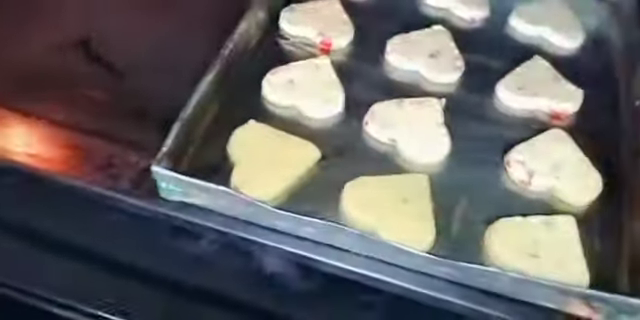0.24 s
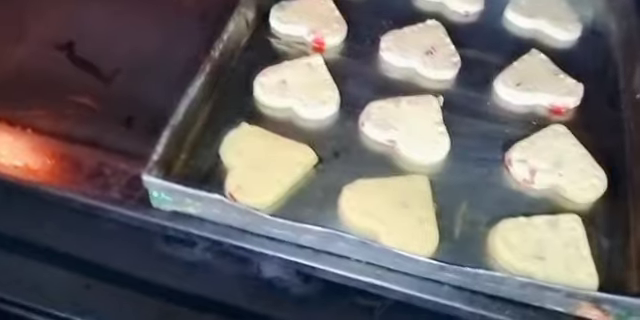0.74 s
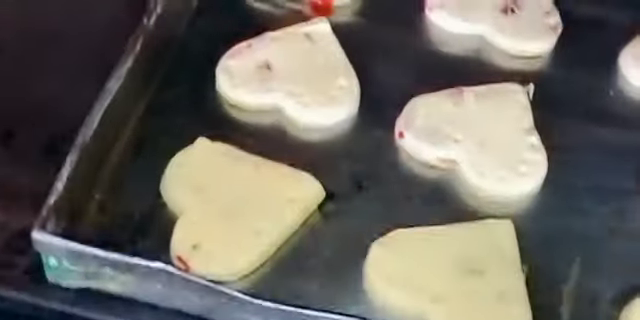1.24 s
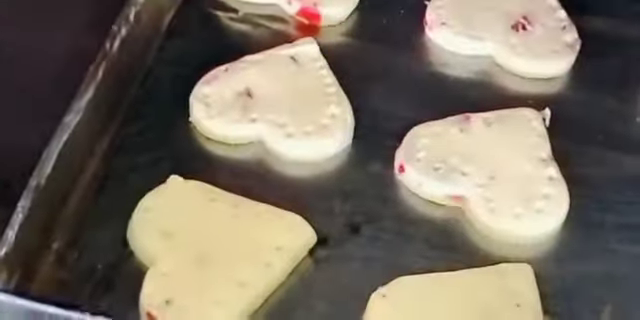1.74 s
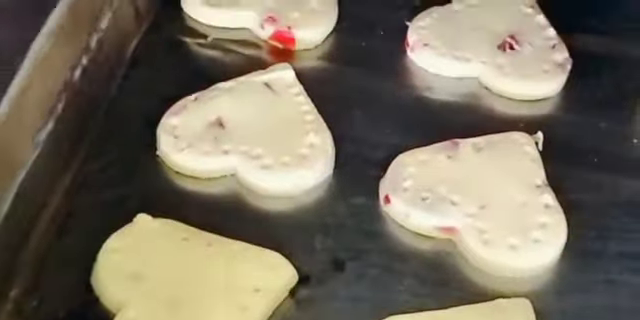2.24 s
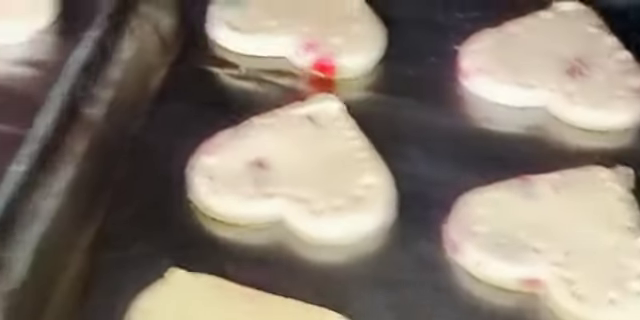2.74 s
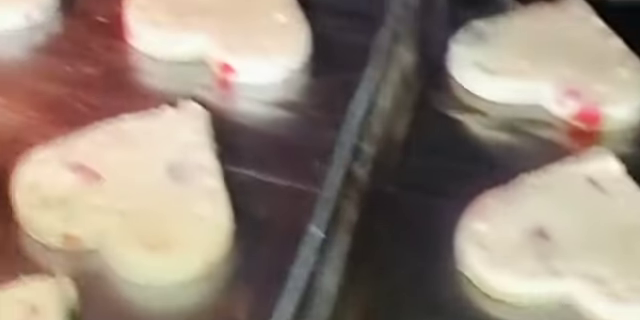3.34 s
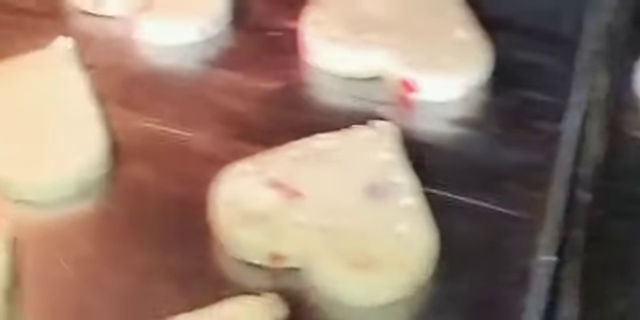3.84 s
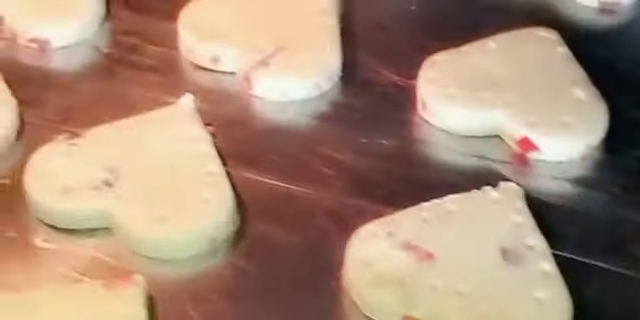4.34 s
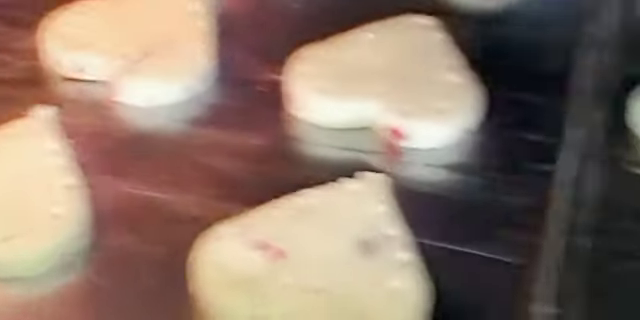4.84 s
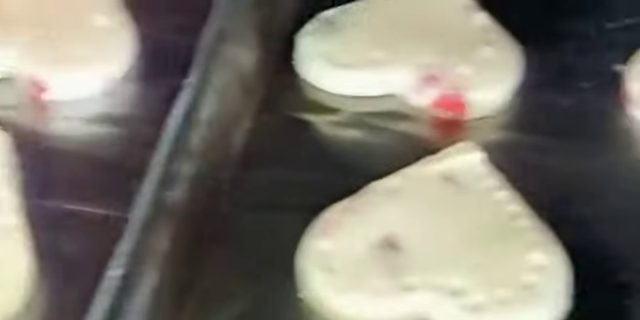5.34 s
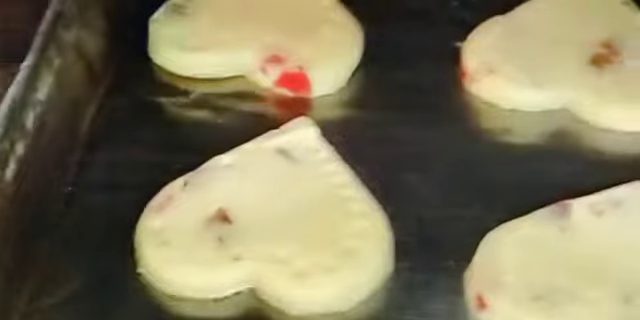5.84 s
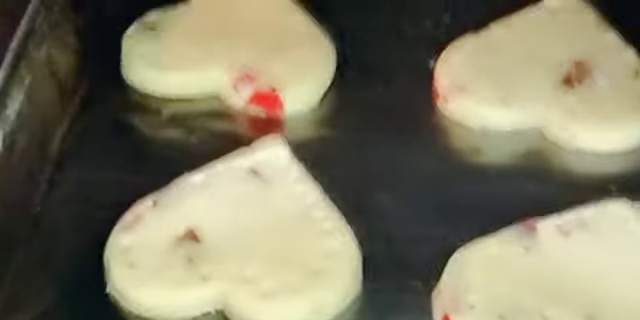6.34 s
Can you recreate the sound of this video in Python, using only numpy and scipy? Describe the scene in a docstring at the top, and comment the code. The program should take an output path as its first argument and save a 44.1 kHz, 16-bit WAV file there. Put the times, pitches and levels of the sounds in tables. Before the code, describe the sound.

Close up inside an oven, a thin steel tray rasps along rack wires, knocks, drops with a ringing bang, rattles, and is nudged into place.

```python
"""In an oven, close to the microphone, a metal baking tray is pushed over a wire rack.
Sliding is made of tiny random slips and singing metal; clinks, knocks and ticks are short noise bursts.
The tray lands with a bang and the rack chatters: noise bursts plus ringing tones, dying in the steel box.
Soft low bumps are short tones; a wavering low hum and a faint hiss of filtered noise go on throughout."""
import sys
import numpy as np
from scipy import signal
from scipy.fft import rfft, irfft, next_fast_len
from scipy.io import wavfile

SR = 44100
rng = np.random.default_rng(int(sys.argv[2]) if len(sys.argv) > 2 else 0)


def master(y):
    """Save y as 16-bit WAV."""
    cut = np.clip(np.atleast_2d(y).T, -1, 1)
    pcm = np.round(cut * 32767)  # scale
    wavfile.write(sys.argv[1], SR, pcm.astype(np.int16))


N = 290839

# The ringing tones of the tray's rim, heard in clinks and in sliding.
# Each row: pitch in Hz, relative level in dB, time to fade by 60 dB in seconds.
RIM_MODES = [(1406, 0.5, 0.25), (1764, -3, 0.27), (2027, 1, 0.14), (2400, -2, 0.16), (2500, -9, 0.5),
             (2770, 0.5, 0.19), (3500, -18, 0.15), (4040, -12.5, 0.16), (4400, -12.5, 0.11),
             (8800, -2.5, 0.076), (8770, -18.5, 0.07)]
# Added to the thump, hollow, ring and edge levels of blows; the reference register ends at 0 dB.
REGISTER_DB = 8
LANDING_S = 3.4283


def amp(db):
    """Turns decibels into a gain."""
    return 10 ** (np.asarray(db) / 20)


def evened(x):
    """Scales a sound to an average (rms) level of 1."""
    return x / np.sqrt(np.mean(x ** 2) + 1e-20)


def add(mix, s, sound):
    """Mixes a sound in, starting at a time in seconds."""
    part = mix[max(round(s * SR), 0):][:len(sound)]
    part += sound[:len(part)]


def filtered(x, order, edges_hz, kind):
    """Keeps only the pitches that a Butterworth filter lets through."""
    return signal.sosfilt(signal.butter(order, edges_hz, kind, fs=SR, output="sos"), x)


def coloured(x, points):
    """Filters by a spectrum given as points (Hz, dB), then scales to rms 1."""
    point_hz, point_db = np.transpose(points)
    size = next_fast_len(len(x))
    f = np.fft.rfftfreq(size, 1 / SR)
    gain = amp(np.interp(np.log(f + 1), np.log(point_hz), point_db))
    return evened(irfft(rfft(x, size) * gain, size)[:len(x)])


def narrow(hz, width_hz):
    """Noise in one resonance: two slow random signals move it up to a centre pitch that may change."""
    r = np.exp(-np.pi * width_hz / SR)
    slow = signal.lfilter([1], np.poly([r, r]), rng.standard_normal((2, N)))
    phase = 2 * np.pi * np.cumsum(hz * np.ones(N)) / SR
    return evened(slow[0] * np.cos(phase) + slow[1] * np.sin(phase))


def waver(per_s):
    """A random wandering of rms 1: straight lines between a number of random points per second."""
    s = np.arange(0, N / SR + 1, 1 / per_s)
    return evened(np.interp(np.arange(N) / SR, s, rng.standard_normal(len(s))))


def kitchen(octave_db=-16, rings_db=62, hum_width_hz=22, drift_db=2):
    """A wavering hum with its octave, and a faint rush of air whose resonances come and go."""
    # The low hum, louder near the oven's mouth. Each row: time in seconds, level in dB, pitch in Hz.
    hum_path = [(0, -53, 119.7), (.8, -63, 115.7), (1.75, -67.5, 111), (3.0, -50, 110.4),
                (4.001, -50.5, 111.2), (5.1, -51.5, 121.2), (5.9, -47.5, 125.7), (6.6, -56.5, 118.3)]
    # Colour of the air noise. Each row: frequency in Hz, relative level in dB per Hz.
    air_colour = [(15, -75.5), (25, -16.5), (119, -10.5), (160, -17.5), (457, -31.5), (537, -32),
                  (684, -29.5), (1170, -37), (1570, -40), (2420, -28.5), (2770, -39), (3000, -39),
                  (6920, -52.5), (9300, -44.5), (15500, -45)]
    # Resonances in the air noise. Each row: pitch in Hz, width in Hz, relative level in dB.
    air_rings = [(570, 20, -80), (1197, 100, -78.5), (1434, 52, -83.5), (2215, 34, -77.5),
                 (2407, 90, -73.5), (3120, 32, -87), (3500, 300, -81.5), (3870, 130, -81.5),
                 (4350, 430, -85.5), (4800, 390, -85.5), (9400, 970, -79.5), (11740, 310, -84),
                 (12050, 150, -87)]
    air_start_db, air_rise_db_per_s = -64, 0.59
    t = np.arange(N) / SR
    s, level_db, pitch_hz = np.transpose(hum_path)
    hum_db = np.interp(t, s, level_db)
    pitch = np.interp(t, s, pitch_hz)
    hum = narrow(pitch, hum_width_hz)
    hum += amp(octave_db) * narrow(2 * pitch, 2 * hum_width_hz)
    air = coloured(rng.standard_normal(N), air_colour)
    for hz, width_hz, db in air_rings:
        air += amp(rings_db + db + drift_db * waver(8.5)) * narrow(hz, width_hz)
    return amp(hum_db) * hum + amp(air_start_db + air_rise_db_per_s * t) * air


def handling():
    """Low buffeting noise as things are moved, dying away, and a few soft bumps of swelling low tones."""
    # Soft low bumps. Each row: start in seconds, level in dB, pitch in Hz, length in seconds.
    bumps = [(0.095, -37, 124, 0.022), (0.158, -41, 76, 0.023), (0.42, -33, 70.6, 0.04),
             (0.921, -40, 69.5, 0.027), (3.328, -34.5, 114, 0.017)]
    buffet_db, hold_s, fade_db_per_s = -42.5, 0.15, 50.5
    low_colour = [(15, -9), (45, -7.0), (90, -2), (160, -17.5), (260, -14.5), (800, -96)]
    out = coloured(rng.standard_normal(N), low_colour)
    fading_s = np.maximum(np.arange(N) / SR - hold_s, 0)
    out *= amp(buffet_db - fade_db_per_s * fading_s)
    for s, db, hz, length_s in bumps:
        t = np.arange(int(length_s * SR)) / SR
        add(out, s, amp(db) * np.hanning(len(t)) * np.sin(2 * np.pi * hz * t))
    return out


def friction(per_s, spread_db, t60):
    """Tiny slips of uneven size, each smeared by the ringing metal for t60 seconds."""
    size_db = spread_db * np.minimum(rng.exponential(1, N), 4)
    slips = (rng.random(N) < per_s / SR) * rng.standard_normal(N) * amp(size_db)
    t = np.arange(SR // 4) / SR
    smear = rng.standard_normal(len(t)) * amp(-60 * t / t60)
    return signal.oaconvolve(slips, smear)[:N]


def push(t, length_s, swell_db_per_s, release_db_per_s, attack_s=0.069):
    """Loudness of a stroke: it builds up, swells or eases while the push lasts, then dies away."""
    held_db = swell_db_per_s * (np.minimum(t, length_s) - length_s / 2)
    release_db = release_db_per_s * np.maximum(t - length_s, 0)
    return np.minimum(t / attack_s, 1) * amp(held_db - release_db)


def sliding(tail_db=-14, tail_t60=.4, contact_width_hz=750):
    """The tray rubs along the wires: the sheet rumbles, the rim rasps, sings and hisses."""
    # Pushes of the tray. Each row: start in seconds, length in seconds, rumble in dB, rasp in dB,
    # hiss in dB, swell in dB per second, singing of the rim in dB next to the rasp,
    # bottom of the rumble in Hz, top of the rasp in Hz, contact resonance in Hz, its relative level in dB.
    strokes = [(-.06, 0.33, -52, -65, -71, -50, -8, 170, 5600, 2114, -4),
               (0.297, .13, -70, -61.5, -66, 3, -4, 170, 5600, 2140, 0),
               (0.573, 0.34, -46.5, -46.5, -61, -4, -5, 302, 6400, 3400, -10),
               (2.102, 0.16, -50, -54.5, -57, -22, -11, 380.4, 4200, 5762, -9.5),
               (2.789, 0.19, -42.5, -51, -59, 54, -11.5, 130, 3670, 1850, -23.5),
               (3.03, 0.3, -53.5, -58, -60.5, -4, -8.5, 131.4, 3700, 1913, -8.5),
               (3.377, 0.044, -49.5, -58.5, -50, 36, -5.5, 131.7, 3620, 1910, -10),
               (4.61, 0.23, -53.5, -71, -76, -8, -2, 130, 5190, 607, -15),
               (5.257, 0.24, -48, -49, -73.5, 21, -19, 170, 4070, 2665, -1.5),
               (5.481, 0.47, -47.5, -64, -74, -12, -19, 93, 3600, 2560, -3)]
    # Colours of the three sounds of sliding. Each row: frequency in Hz, relative level in dB per Hz.
    rumble_colour = [(90, -13), (170, -4), (260, -2), (340, -4.5), (420, -6.5), (480, -10.5), (570, -1.5),
                     (750, -12), (1000, -14.5), (1400, -25), (2500, -59.5)]
    rasp_colour = [(700, -21.5), (1150, 9.5), (1420, -7.5), (1600, 9.5), (2000, 10.5), (2450, 13),
                   (2680, 1), (2900, -5.5), (3800, -0.5), (5000, -7), (7000, -24.5)]
    hiss_colour = [(3000, -8), (4500, -7), (5800, -10), (7200, -11.5), (8200, -8.5), (9200, 0), (10500, -8),
                   (12500, -15), (15500, -16.5)]
    rumble = coloured(friction(1500, 1.0, 0.11), rumble_colour)
    rasp = coloured(friction(1200, 0.68, 0.12), rasp_colour)
    hiss = coloured(rng.standard_normal(N), hiss_colour)
    # a tone that rings for less time is spread over a wider band
    singing = evened(sum(amp(db) * narrow(hz, 12 / t60) for hz, db, t60 in RIM_MODES))
    out = np.zeros(N)
    for (start, length_s, rumble_db, rasp_db, hiss_db, swell, singing_db,
         bottom_hz, top_hz, contact_hz, contact_db) in strokes:
        first = max(int(start * SR), 0)
        at = np.arange(first, min(int((start + length_s + .5) * SR), N))
        rim = filtered(rasp[at] + amp(singing_db) * singing[at], 4, top_hz, "low")
        rim += amp(contact_db) * narrow(contact_hz, contact_width_hz)[at]
        sheet = filtered(rumble[at], 2, bottom_hz, "high")
        # the last number is how fast each sound dies after the push, in dB per second
        voices = [(sheet, rumble_db, 111.5), (rim, rasp_db, 164.5), (hiss[at], hiss_db, 163)]
        for voice, db, release in voices:
            out[at] += amp(db) * evened(voice) * push(at / SR - start, length_s, swell, release)
    # the box carries the rubbing on for a moment, darker
    t = np.arange(SR // 2) / SR
    box_colour = [(100, 11.5), (800, -14.0), (2500, -10.5), (8000, -13.0)]
    tail = coloured(rng.standard_normal(len(t)), box_colour) * amp(-60 * t / tail_t60)
    return out + amp(tail_db) * signal.oaconvolve(out, tail / np.linalg.norm(tail))[:N]


def ticks(level_db=-9, t60=0.13):
    """Thin bright bursts of fading noise as the rim passes a wire."""
    # Each row: start in seconds, relative level in dB.
    tick_times = [(0.3301, -49.5), (2.0715, -49), (3.004, -39), (3.0864, -36), (3.1799, -35.5),
                  (3.273, -41), (3.3108, -43), (4.044, -58), (4.2754, -57.5), (6.119, -54), (6.493, -54)]
    # Colour of a tick. Each row: frequency in Hz, relative level in dB per Hz.
    tick_colour = [(500, 4.5), (2400, 0), (4500, 0), (7000, -6.5), (9300, 8), (12000, -3), (15500, -4)]
    out, t = np.zeros(N), np.arange(SR // 4) / SR
    for s, db in tick_times:
        burst = coloured(rng.standard_normal(len(t)), tick_colour)
        add(out, s, amp(db + level_db - 60 * t / t60) * burst)
    return out


def blow(colour, modes, modes_db, band_db, damping, box_db, crack_db, contact_s, crack_t60=0.05, detune=.008):
    """One contact: a crack and a dense burst dying in the oven box, plus single ringing tones."""
    # Ring of the oven box, before damping. Each row: frequency in Hz, fade time (60 dB) of the first
    # burst in seconds, fade time of the tail in seconds, relative level of the tail in dB.
    box = [(60.3, 0.18, 1, 16.5), (158, 0.058, 1, 8.5), (365, 0.37, 0.28, -5), (652, 0.33, 0.69, -5),
           (1180, 0.18, 0.5, -5.5), (2300, 0.14, 0.46, -11), (3710, 0.25, 0.27, -3),
           (7400, 0.06, 0.39, -20), (14900, 0.18, 0.12, -10.5)]
    size = 48000
    t, f = np.arange(size) / SR, np.fft.rfftfreq(size, 1 / SR)
    head = slice(0, int(.014 * SR))
    noise = rfft(coloured(rng.standard_normal(size), colour))
    centres = np.log([row[0] for row in box])
    crack = amp(crack_db - 60 * t / crack_t60)
    x = np.zeros(size)
    for own, (_, burst_t60, tail_t60, tail_db) in zip(np.eye(len(box)), box):
        # each band overlaps its neighbours smoothly
        band = irfft(noise * np.interp(np.log(f + 1), centres, own))
        burst = amp(-60 * t * damping / burst_t60)
        tail = amp(tail_db + box_db - 60 * t * damping / tail_t60)
        x += band * (crack + burst + tail)
    # the modes shift a little with the way the tray is supported
    ring = np.zeros(size)
    for hz, db, t60 in modes:
        shifted_hz = hz * (1 + detune * rng.standard_normal())
        ring += amp(db - 60 * t / t60) * np.sin(2 * np.pi * (shifted_hz * t + rng.random()))
    # balance both by their first 14 ms
    x = x / x[head].std() + amp(modes_db) * ring / ring[head].std()
    # a longer contact gives a softer start
    x *= 1 - np.exp(-(t / contact_s) ** 2)
    # thump, hollow, ring and edge: where and how hard it is struck sets their balance
    registers = [(2, (80, 300)), (4, (300, 900)), (4, (900, 3000)), (4, (3000, 16000))]
    out = np.zeros(size)
    for (order, edges_hz), db in zip(registers, band_db):
        part = filtered(x, order, edges_hz, "band")
        out += amp(db) * part / part[:2 * head.stop].std()
    return out


def clinks(level_db=-12, typical_db=-38):
    """Light metal contacts: bright blows that ring the rim."""
    # Each row: start in seconds, relative level of the bright edge in dB,
    # ring in dB (before REGISTER_DB is added).
    clink_times = [(0.4517, -37.5, -8.5), (0.4688, -39.5, -1.5), (0.5655, -30.5, -8), (0.618, -27, -6.5),
                   (0.7127, -34, -0.5), (0.84, -31, -5.5), (1.6864, -41, -13), (4.3968, -45, -2.5),
                   (4.9162, -56, 2.5), (4.9348, -46, -3), (5.0891, -36, -5.5), (5.1547, -36.5, -8.5),
                   (5.2483, -40, -5)]
    # Colour of a clink. Each row: frequency in Hz, relative level in dB per Hz.
    clink_colour = [(59, -73), (100, -10), (134, -4), (169, -22), (403, 8), (467, 5.5), (998, -13),
                    (1430, -7.5), (2220, -9.5), (2470, 1.5), (2630, -13.5), (3460, -11), (5870, -16.5),
                    (9540, -7), (15500, -29.5)]
    out = np.zeros(N)
    for s, db, ring_db in clink_times:
        # the hollow note hardly grows with strength, so harder clinks sound brighter
        hollow_db = -8 - 0.74 * (db - typical_db)
        thump_db = hollow_db - 10.5
        bands = np.array([thump_db, hollow_db, ring_db, -REGISTER_DB]) + REGISTER_DB
        sound = blow(clink_colour, RIM_MODES, -13, bands, damping=1.4, box_db=10.5,
                     crack_db=-38, contact_s=0.00097)
        add(out, s, amp(db + level_db) * sound)
    return out


def knocks(level_db=-11, modes_db=-8, tail_db=-2.0):
    """The tray knocks against the rack, and its floor rings."""
    # Each row: start in seconds, relative level of the ring in dB, then thump, hollow and bright edge
    # in dB (before REGISTER_DB is added), damping factor, contact time in seconds.
    knock_times = [(0.8829, -25, -22, -9, -31.5, 0.65, 0.0023),
                   (2.5221, -21.5, -21.5, -14, -23.5, 1.09, 0.0012),
                   (2.81, -35.5, -11.5, 1.5, -24, 0.8, .001), (2.934, -26.5, -9, 1.5, -19, 0.87, 0.0014)]
    # Colour of a knock. Each row: frequency in Hz, relative level in dB per Hz.
    knock_colour = [(35, -40.5), (60, -10.5), (123, 5.5), (351, -4), (423, -20), (521, 4.5), (599, -5.5),
                    (931, -15.5), (1350, -19), (1910, -9), (2470, -14.5), (3190, -25.5), (7900, -25.5),
                    (9510, -22), (15500, -45.5)]
    # Ringing tones of the tray's floor. Each row: pitch in Hz, relative level in dB,
    # time to fade by 60 dB in seconds.
    tray_modes = [(114.4, 0.5, 1.6), (153, -10.5, .7), (180, -1, 0.69), (221, 5.5, 0.39), (524, 5.5, 0.21),
                  (677, -1, 0.49), (708, -4.5, 0.41), (798, -11.5, 0.36), (900, 4, 0.05),
                  (958, -13.5, 0.34), (1134, 2, 0.067), (1445, -5.5, 0.11), (2040, -9, 0.24),
                  (2570, -28, 0.1)]
    out = np.zeros(N)
    for s, db, thump_db, hollow_db, edge_db, damping, contact_s in knock_times:
        bands = np.array([thump_db, hollow_db, -REGISTER_DB, edge_db]) + REGISTER_DB
        sound = blow(knock_colour, tray_modes, modes_db, bands, damping, box_db=tail_db,
                     crack_db=5.5, contact_s=contact_s, crack_t60=0.083, detune=0.0054)
        add(out, s, amp(db + level_db) * sound)
    return out


def pings():
    """Faint pings of the metal: each is a short dying patch of one resonance."""
    # Each row: start in seconds, level at the start in dB, pitch in Hz, width in Hz,
    # time to fade by 60 dB in seconds.
    ping_times = [(1.33, -67, 1400, 493, 0.21), (4.02, -58.5, 2360, 458, 0.057),
                  (6.33, -60.5, 653, 254, 0.089)]
    out, t = np.zeros(N), np.arange(SR // 5) / SR
    for s, db, hz, width_hz, t60 in ping_times:
        add(out, s, amp(db - 60 * t / t60) * narrow(hz, width_hz)[-len(t):])
    return out


def landing_and_chatter(level_db=-12.5, landing_tail_db=0, chatter_tail_db=-6):
    """The tray drops onto the rack with a bang, and the rack's light wires chatter after it."""
    # The chatter. Each row: start in seconds, relative level of the ring in dB,
    # hollow and bright edge in dB (before REGISTER_DB is added).
    bounces = [(3.4659, -19.5, -13.5, -35), (3.4981, -20, -8, -35), (3.5321, -15.5, -11.5, -23),
               (3.5644, -27.5, -18, -26), (3.596, -23, -13, -33), (3.6223, -35.5, -16, -31),
               (3.6581, -35.5, -4, -44), (3.7232, -31.5, -7, -40), (3.7535, -42, -5, -33),
               (3.7857, -31.5, -19, -37)]
    # Colour of a bounce. Each row: frequency in Hz, relative level in dB per Hz.
    bounce_colour = [(29, -45.5), (50, -3), (87, -28.5), (124, -20.5), (333, -4), (375, 3), (413, 4),
                     (525, 1), (891, -16.5), (981, -18), (1340, -21), (2270, -19), (3030, -39.5),
                     (8920, -42), (15500, -58.5)]
    # Ringing tones of the rack. Each row: pitch in Hz, relative level in dB,
    # time to fade by 60 dB in seconds.
    rack_modes = [(93.6, -7, 1.9), (107.9, -13.5, 1.3), (141.6, -15, 0.5), (222, -10.5, 0.34),
                  (261, -0.5, 0.45), (285, -10.5, .8), (387, -8.5, 0.67), (457, -8.5, 0.57),
                  (525, -6, 0.61), (699, -9, 0.32), (835, -11.5, 0.38), (954, 5.5, 0.049),
                  (1015, 6.5, 0.064), (1225, -5, 0.085), (1838, -17.5, 0.2), (2030, -20.5, 0.11),
                  (2221, -15, 0.21)]
    # start, ring, thump, hollow, edge, tail of the box
    rack_blows = [(LANDING_S, -9.5, -9, -5.5, -28.5, landing_tail_db)]
    for s, db, hollow_db, edge_db in bounces:
        # light wires jump with little bass; as the chatter dies, its thump fades more slowly than its ring
        thump_db = -18 + 19.5 * (s - LANDING_S)
        rack_blows.append((s, db, thump_db, hollow_db, edge_db, chatter_tail_db))
    out = np.zeros(N)
    for s, db, thump_db, hollow_db, edge_db, box_db in rack_blows:
        bands = np.array([thump_db, hollow_db, -REGISTER_DB, edge_db]) + REGISTER_DB
        sound = blow(bounce_colour, rack_modes, -1.6, bands, damping=0.78, box_db=box_db,
                     crack_db=3.5, contact_s=0.0022, detune=0.0065)
        add(out, s, amp(db + level_db) * sound)
    return out


def drags(grit_db=0.5):
    """The rim catches and judders in a few short squeaking rasps as the tray comes to rest."""
    # Each row: start in seconds, relative level in dB, length in seconds (loudest halfway).
    drag_times = [(5.852, -40.5, 0.067), (5.907, -38, 0.035), (5.935, -46.5, 0.054)]
    # Colour of a drag. Each row: frequency in Hz, relative level in dB per Hz.
    drag_colour = [(300, -17), (850, -18), (1250, -18), (1700, -7), (2030, 3), (2500, -2), (2950, -12),
                   (3800, -11), (4900, -27), (9500, -37), (15000, -45)]
    level = np.zeros(N)
    for s, db, length_s in drag_times:
        u = np.arange(SR // 4) / SR / length_s
        add(level, s, amp(db) * (2 * u) ** 4 * np.exp(4 - 8 * u))
    judder = amp(grit_db * waver(200))
    return level * judder * coloured(friction(3000, 1, .12), drag_colour)


def walls(x, echo_db=-4, above_hz=2800, t60=.024):
    """The close steel walls return the treble within milliseconds and comb it finely."""
    t = np.arange(SR // 40) / SR
    echoes = rng.standard_normal(len(t)) * amp(-60 * t / t60) * (t > .001)
    echoes = filtered(echoes / np.linalg.norm(echoes), 2, above_hz, "high")
    return x + amp(echo_db) * signal.oaconvolve(x, echoes)[:N]


def scene():
    """Adds all sources at one microphone; only the metal sounds echo off the walls."""
    metal = sliding() + ticks() + clinks() + knocks() + pings() + landing_and_chatter() + drags()
    return (kitchen() + handling() + walls(metal))[None]


def record(dry, edge_hz=15650):
    """The recorder's band limit: a steep filter removes the highest treble."""
    lowpass = signal.firwin(511, edge_hz, window=("kaiser", 9), fs=SR)
    return signal.oaconvolve(dry, lowpass[None], "same")


dry = scene()
out = record(dry)
master(out)
```